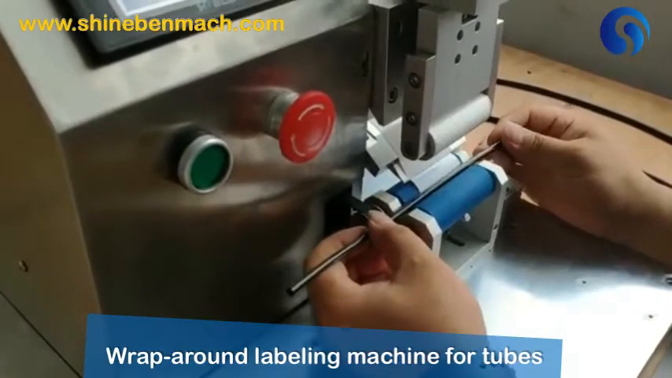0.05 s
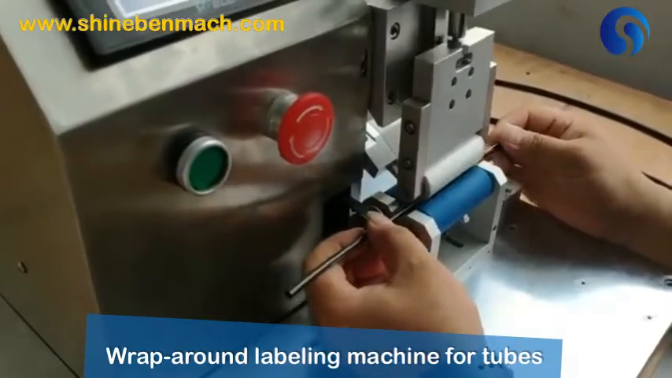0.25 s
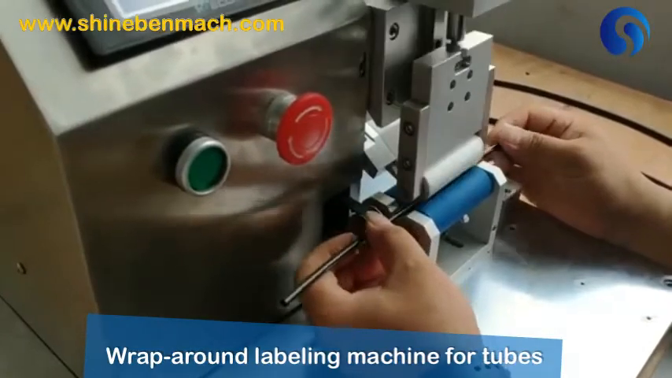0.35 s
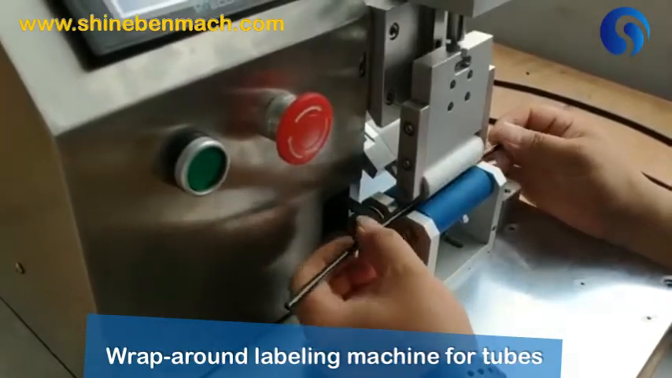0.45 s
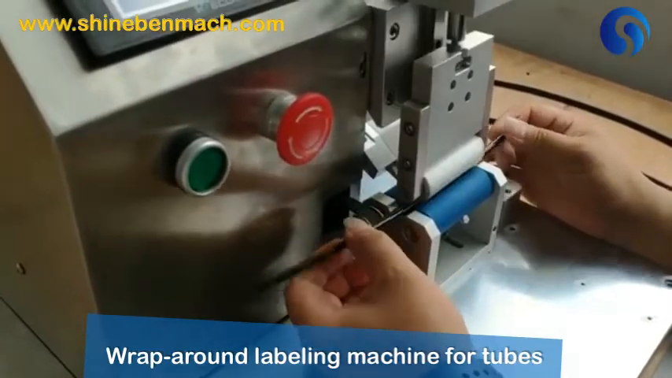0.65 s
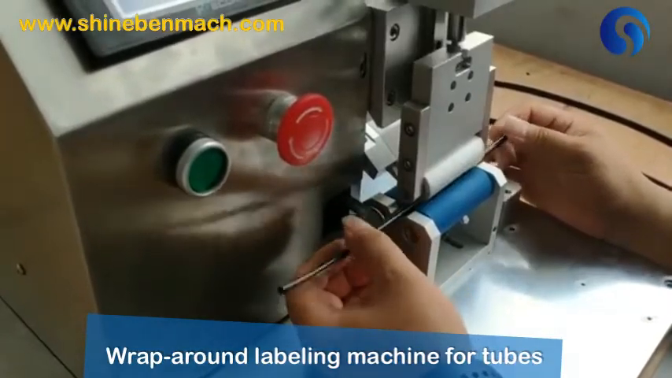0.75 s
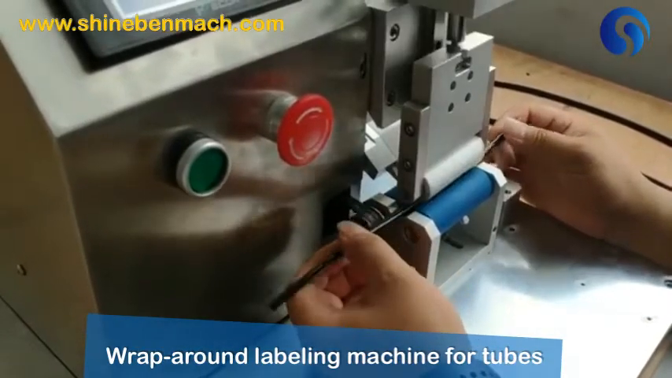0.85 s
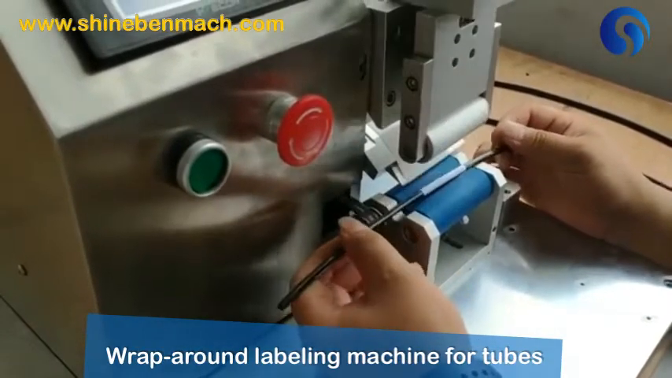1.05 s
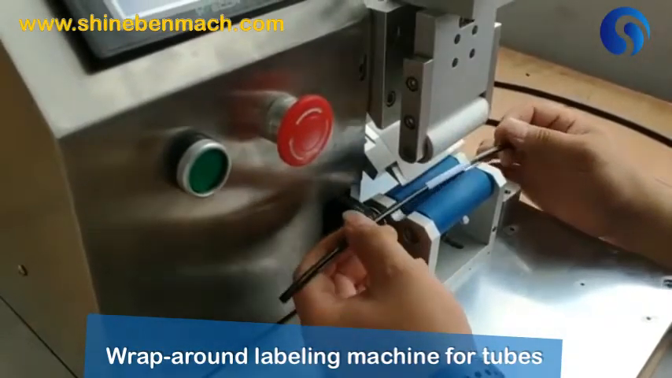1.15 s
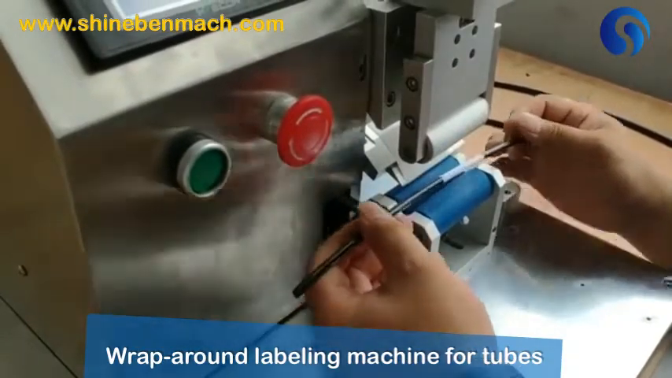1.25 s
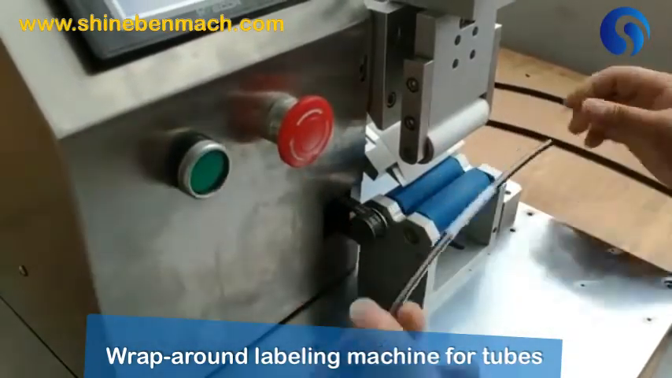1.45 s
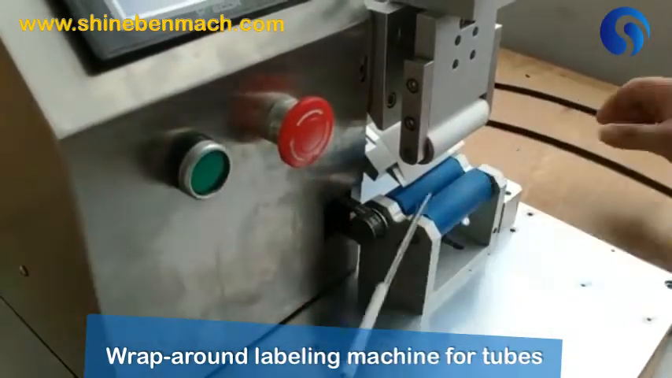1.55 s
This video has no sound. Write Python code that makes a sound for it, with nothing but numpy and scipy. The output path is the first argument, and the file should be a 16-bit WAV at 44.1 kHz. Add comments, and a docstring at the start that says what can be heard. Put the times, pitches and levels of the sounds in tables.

```python
"""A labeling machine close to the microphone runs one cycle in a hard-walled workshop.
Its valve spits narrow jets, air rushes out of the cylinder as shaped noise and the steel head clacks down.
The label feed whirs and clicks; a second rush throws the head back against its upper stop.
Contacts are bursts of noise that also ring resonators for the steel frame; a diffuse echo is the hall.
Behind it lie the room's broad hiss, which sinks a few dB, and three wavering motor tones."""
import sys
import numpy as np
from scipy import signal
from scipy.fft import rfft, irfft
from scipy.io import wavfile

SR = 44100
rng = np.random.default_rng(int(sys.argv[2]) if len(sys.argv) > 2 else 0)


def transcribe(u):
    """Save the signal u as a 16-bit wav file named by the first command-line argument.

    u: samples, shape (n,) or (channels, n), limited to [-1, 1]; the rate is SR.
    q: integer samples, one column per channel.
    """
    v = np.clip(np.atleast_2d(u).T, -1, 1)
    q = np.round(v * 32767).astype(np.int16)
    wavfile.write(sys.argv[1], SR, q)


N = 72765

T = np.arange(N) / SR
HZ = np.maximum(np.fft.rfftfreq(2 * N, 1 / SR), 1)

# Workshop hiss, spectrum: pitch_hz, density_db (relative, per Hz)
HISS_SPECTRUM = [(40, -44), (100, -18), (170, -8), (260, -3.5), (350, -8), (520, -3.5), (700, -3.5),
                 (1050, -1.5), (1400, -5), (1800, -4), (2800, -6.5), (4200, -14.5), (6000, -30.5),
                 (7300, -23)]
# Workshop hiss over time: time_s, level_db
HISS_LEVEL = [(0, -29.5), (.15, -28), (.5, -28), (.8, -31.5), (1.3, -33), (1.65, -33)]
# Running motors: pitch_hz, level_db (before the waver)
MOTOR_TONES = [(266, -50.5), (1085, -45.5), (1648, -48.5)]
# Decay of the hall: pitch_hz, t60_s
HALL_T60 = [(200, 1.2), (1000, 1.16), (2500, 0.96), (4200, 1.06), (7000, 0.63)]
# Colour of the hall's echo: pitch_hz, level_db (relative)
HALL_COLOUR = [(100, -11.5), (250, -17), (500, 1), (900, -10.5), (1500, -3.5), (2800, -1), (4200, -4.5),
               (6000, -3), (7500, 1.5)]

# Label feed running: time_s, level_db (before the rattle)
FEED_LEVEL = [(.46, -46), (.52, -30.5), (.57, -26), (.69, -30), (.8, -40.5), (.9, -60)]
# Label feed, spectrum: pitch_hz, density_db (relative, per Hz)
FEED_SPECTRUM = [(120, -8), (180, 8), (260, -5), (420, 9), (700, -3.5), (1100, 3), (2600, 3.5), (4500, 3.5),
                 (6000, -10.5), (7400, -1.5)]
# Label web advancing once the head is up: time_s, level_db (before the rattle)
ADVANCE_LEVEL = [(1.03, -60), (1.08, -22), (1.27, -27), (1.38, -33.5), (1.55, -52)]
# Advancing web, spectrum: pitch_hz, density_db (relative, per Hz)
ADVANCE_SPECTRUM = [(170, -30), (330, -10), (520, -9.5), (690, -10), (860, 4.5), (1120, -4.5), (1450, -6.5),
                    (2800, -4), (4400, -13), (6000, -22), (7400, -35)]

# Narrow jets at the valve: peak_s, half_length_s, level_db (at the peak), pitch_hz (centre), width_octaves
SPITS = [(.226, 0.0075, -17.5, 4900, 0.37), (0.4, 0.05, -22.5, 3890, 0.29), (.542, 0.0075, -23, 4820, 0.15),
         (0.853, 0.013, -36, 4080, 0.015), (0.913, 0.0034, -18.5, 5430, 0.18),
         (.927, 0.0062, -16.5, 4550, 0.6), (0.998, 0.012, -25, 4220, 0.021),
         (1.028, 0.0047, -18, 7260, 0.13)]
# Air leaving the cylinder: start_s, length_s, level_db (of the settled rush), puff_db (extra at the start),
# press_db (extra as the piston nears its stop), tilt_db_per_octave, port_hz (not used)
STROKES = [(0.233, 0.1164, -18, 5, 4.5, 1.5, 3090), (0.937, .096, -19.5, 6.5, 8, 0, 4000)]
# Exhaust air, spectrum before the tilt: pitch_hz, density_db (relative, per Hz)
EXHAUST_SPECTRUM = [(150, -41), (300, -11.5), (650, -14.5), (1250, 0.5), (2200, -2.5), (3200, 2.5),
                    (3700, -2), (4250, 0.5), (4900, -5.5), (6100, -16.5), (7300, -4)]
# Edges of the bands that flutter separately: pitch_hz
FLUTTER_EDGES_HZ = [0, 1800, 3600, 5200, 9000]

# Pitches of the frame modes: pitch_hz
MODE_HZ = [225, 310, 398, 512, 610, 908, 1090, 1130, 1210, 1300, 1417, 1646, 2769, 3003, 3138, 3328, 3403,
           3668, 3957, 4194, 4329]
# The same modes: down_db (head going down), up_db (head going up), t60_s; levels before a random spread
MODES = [(-42, -28, 0.54), (-31, -36.5, 0.18), (-23.5, -40, 0.59), (-21, -18, 0.3), (-22.5, -55, 0.05),
         (-23, -20, 0.31), (-23.5, -14, 0.12), (-12.5, -31, 0.074), (-23, -23.5, 0.86), (-22, -20, 0.43),
         (-21, -28, 0.1), (-28, -18, 0.2), (-21, -27, .45), (-22.5, -34, 0.25), (-18, -32, .4),
         (-13.5, -19.5, 0.38), (-18.5, -26, .42), (-21.5, -30, 0.41), (-18.5, -21, 0.6), (-19.5, -25, 0.31),
         (-16.5, -27, .45)]
# Contacts of valve, head and feed: start_s, thud_db, clack_db, ring_db, treble_db (all before KNOCK_DB),
# attack_s, t60_s, passed_db (into the frame)
KNOCKS = [(0.202, -23.5, -20.5, -25, -33.5, 0.0026, 0.28, -9.5),
          (0.2299, -33, -10.5, -23, -35.5, 0.0002, 0.072, -2),
          (0.2378, -49, -36, -24.5, -34, 0.0024, 0.089, -2),
          (.344, -28.5, -8.5, -12, -33, 0.0042, 0.11, -15),
          (.356, -22.5, -21.5, -33, -34.5, 0.012, 0.22, -5), (0.571, -63, -51, -11, -49, 0.00054, .02, -28),
          (0.6165, -43.5, -16.5, -10.5, -19.5, 0.00052, 0.05, -27),
          (0.9228, -23, -29.5, -23.5, -16.5, 0.0044, 0.047, 2),
          (0.9339, -20.5, -9, -11.5, -13.5, 0.00025, 0.079, -4),
          (1.0292, -23.5, -19, -3.5, -37, 0.00041, 0.028, -10.5),
          (1.038, -30, -24, -34, -39, 0.0013, 0.15, -3), (1.066, -28.5, -34, -28, -35, .004, 0.22, -6)]
# Centres of thud, clack, ring and treble: pitch_hz
KNOCK_HZ = [400, 1300, 3000, 6000]
# Dense, short-lived vibration of the housing: pitch_hz, density_db (relative, per Hz)
HOUSING_SPECTRUM = [(40, -6.5), (130, -19), (220, 3.5), (310, 11.5), (410, -9), (530, 6.5), (740, -4.5),
                    (1150, 1.5), (1600, -0.5), (2100, -3.5), (3200, -5.5), (5000, -6.5), (7500, -23)]

HUM_WAVER = .7  # spread of the motor tones' amplitude, as a share
HALL_DB, HALL_BUILD_S = -2.5, 0.059
RATTLE_DB = .8  # spread of the feed's level
ATTACK_S, PUFF_S, PRESS_S, RELEASE_S = 0.0036, 0.033, 0.0096, 0.011  # time scales of an air rush
FLUTTER_DB = 2  # spread of the rush in each band
HEAD_RISES_S = .88
MODE_SPREAD_DB = 1
KNOCK_DB, CRACK_DB, CRACK_S = 6, 6, 0.0021  # lift of all knocks; a hard contact starts with a short crack
LOW_CUT_HZ, CUTOFF_HZ = 197, 7450


def from_db(db):
    """Decibels to gain."""
    return 10 ** (np.asarray(db) / 20)


def at_hz(points, hz=HZ):
    """Read a spectrum on a log-frequency axis."""
    pitch_hz, value = np.transpose(points)
    return np.interp(np.log(hz), np.log(pitch_hz), value)


def level(points):
    """Gain over time from points of time_s and level_db."""
    return from_db(np.interp(T, *np.transpose(points)))


def noise(colour_db, boost_db=0):
    """Noise of a given colour at rms 1, then boosted by frequency."""
    gain = from_db(colour_db) * (HZ < CUTOFF_HZ + 500)
    gain = gain / np.sqrt(np.mean(gain ** 2))
    white = rfft(rng.standard_normal(2 * N))
    return irfft(white * gain * from_db(boost_db))[:N]


def drift(rate_hz):
    """Smooth random wandering, spread 1, weaker and weaker above the given rate."""
    return noise(-20 * np.log10(1 + (HZ / rate_hz) ** 2))


def dying(start_s, t60_s, attack_s=.0006):
    """Envelope of a blow: linear rise, then a steady decay in dB."""
    age = np.maximum(T - start_s, 0)
    rise = np.minimum(age / attack_s, 1)
    return rise * from_db(-60 * np.maximum(age - attack_s, 0) / t60_s)


def workshop():
    """The room behind the machine: broad hiss and motor tones that waver in phase and strength."""
    out = level(HISS_LEVEL) * noise(at_hz(HISS_SPECTRUM))
    for pitch_hz, level_db in MOTOR_TONES:
        tone = np.sqrt(2) * np.sin(2 * np.pi * pitch_hz * T + drift(2.9))
        out += from_db(level_db) * tone * (1 + HUM_WAVER * drift(17))
    return out


def hall(source):
    """Diffuse echo from the hard walls: noise that builds up and dies band by band."""
    white = rfft(rng.standard_normal(2 * N)) * from_db(at_hz(HALL_COLOUR))
    edges_hz = np.geomspace(80, 8000, 11)
    response = np.zeros(N)
    for low, high in zip(edges_hz, edges_hz[1:]):
        band = irfft(white * (HZ >= low) * (HZ < high))[:N]
        response += band * dying(0, at_hz(HALL_T60, np.sqrt(low * high)))
    response *= (1 - np.exp(-T / HALL_BUILD_S)) / np.sqrt(SR / 10)
    return from_db(HALL_DB) * signal.fftconvolve(source, response)[:N]


def feed():
    """Rollers draw the label round the tube, then the web whirs on: two rattling noises."""
    out = np.zeros(N)
    for run, spectrum in ((FEED_LEVEL, FEED_SPECTRUM), (ADVANCE_LEVEL, ADVANCE_SPECTRUM)):
        rattle = from_db(RATTLE_DB * drift(37))
        out += level(run) * noise(at_hz(spectrum)) * rattle
    return out


def spits():
    """Short, half-whistling jets as air ports open and close: narrow noise that swells and fades."""
    out = np.zeros(N)
    for peak_s, half_s, level_db, pitch_hz, width_octaves in SPITS:
        swell = np.exp(-.5 * ((T - peak_s) / half_s) ** 2)
        octaves_off = np.log2(HZ / pitch_hz)
        jet = noise(-20 * np.log10(1 + (octaves_off / width_octaves) ** 2))
        out += from_db(level_db) * swell * jet
    return out


def exhaust():
    """Air bursts from the cylinder, settles to a band-by-band flutter, swells as the piston arrives and stops."""
    out = np.zeros(N)
    for start_s, length_s, level_db, puff_db, press_db, tilt_db, _ in STROKES:
        age = np.maximum(T - start_s, 0)
        gate = np.minimum(age / ATTACK_S, 1) * np.exp(-np.maximum(age - length_s, 0) / RELEASE_S)
        puff = puff_db * np.exp(-(age / PUFF_S) ** 2)
        press = press_db * np.exp(-((age - length_s) / PRESS_S) ** 2)
        flow_db = level_db + puff + press
        colour_db = at_hz(EXHAUST_SPECTRUM) + tilt_db * np.log2(HZ)
        for low, high in zip(FLUTTER_EDGES_HZ, FLUTTER_EDGES_HZ[1:]):
            band = noise(colour_db, np.where((HZ >= low) & (HZ < high), 0, -np.inf))
            out += gate * from_db(flow_db + FLUTTER_DB * drift(120)) * band
    return out


def frame():
    """Contacts ring the steel frame: decaying resonators whose strength depends on the head's travel."""
    out = np.zeros(N)
    for pitch_hz, (down_db, up_db, t60_s) in zip(MODE_HZ, MODES):
        clicks = np.full(N, 1e-18)  # tiny offset keeps the resonator's numbers from vanishing
        for start_s, *colour_db, _, _, passed_db in KNOCKS:
            # the pitch's share of the contact, relative to its strongest part
            share_db = at_hz(list(zip(KNOCK_HZ, colour_db)), pitch_hz) - max(colour_db)
            mode_db = down_db if start_s < HEAD_RISES_S else up_db
            spread_db = MODE_SPREAD_DB * rng.standard_normal()
            clicks[int(start_s * SR)] = from_db(passed_db + share_db + mode_db + spread_db)
        radius = from_db(-60 / (t60_s * SR))
        angle = 2 * np.pi * pitch_hz / SR
        out += signal.lfilter([0, np.sin(angle)], [1, -2 * radius * np.cos(angle), radius ** 2], clicks)
    return out


def knocks():
    """Each contact cracks, then shakes the housing: a decaying noise burst with a colour of its own."""
    out = np.zeros(N)
    for start_s, *colour_db, attack_s, t60_s, _ in KNOCKS:
        crack_db = CRACK_DB * np.exp(-np.maximum(T - start_s, 0) / CRACK_S)
        shaking = noise(at_hz(HOUSING_SPECTRUM), at_hz(list(zip(KNOCK_HZ, colour_db))))
        out += shaking * from_db(KNOCK_DB + crack_db) * dying(start_s, t60_s, attack_s)
    return out


def scene():
    """The machine close by, its echo from the hall and the workshop behind, in mono."""
    machine = knocks() + exhaust() + spits()  # only these excite the hall
    return (machine + frame() + hall(machine) + feed() + workshop())[None]


def record(dry):
    """Microphone channel: the bass is cut, peaks beyond full scale clip, the top is cut steeply."""
    low_cut = signal.butter(4, LOW_CUT_HZ, "high", fs=SR, output="sos")
    thin = signal.sosfilt(low_cut, dry)
    top_cut = signal.ellip(12, .2, 80, CUTOFF_HZ, fs=SR, output="sos")
    return signal.sosfilt(top_cut, np.clip(thin, -1, 1))


dry = scene()
out = record(dry)
transcribe(out)
```